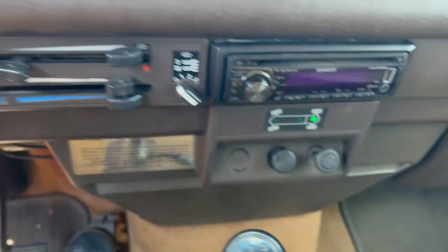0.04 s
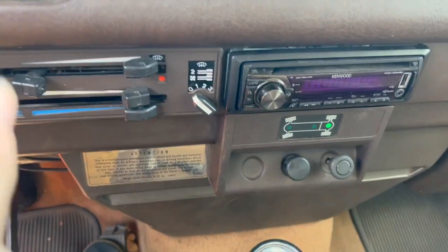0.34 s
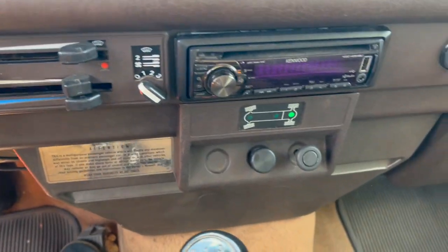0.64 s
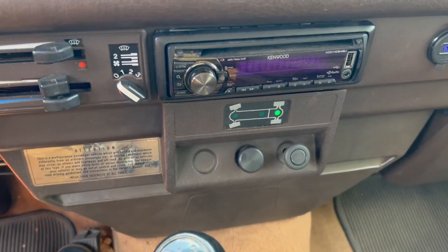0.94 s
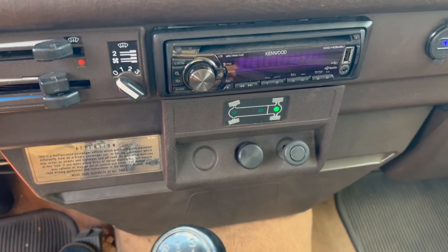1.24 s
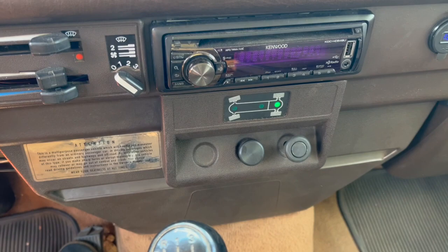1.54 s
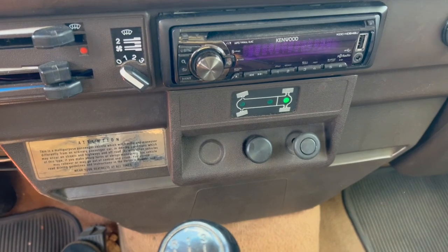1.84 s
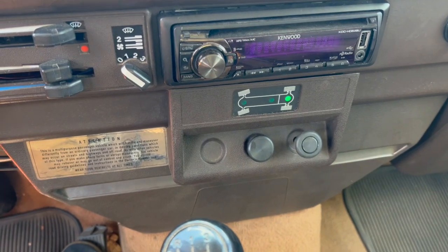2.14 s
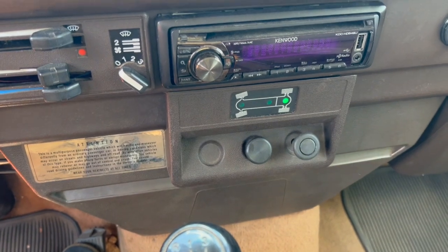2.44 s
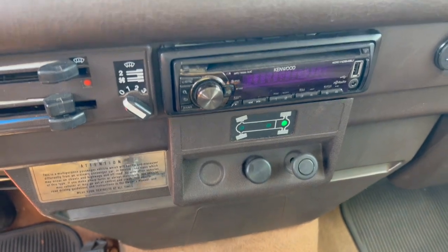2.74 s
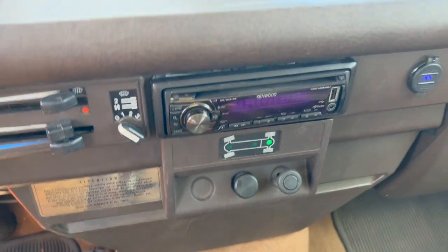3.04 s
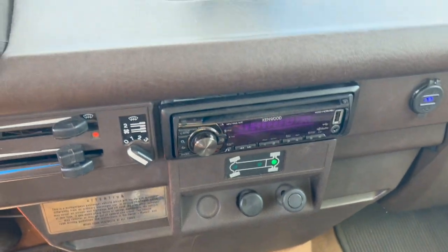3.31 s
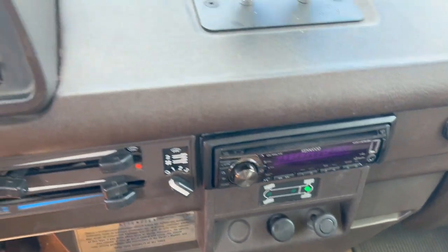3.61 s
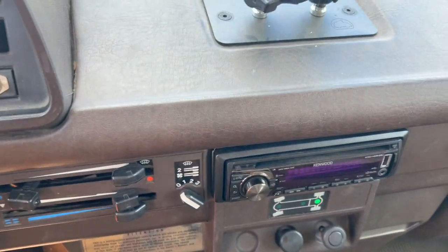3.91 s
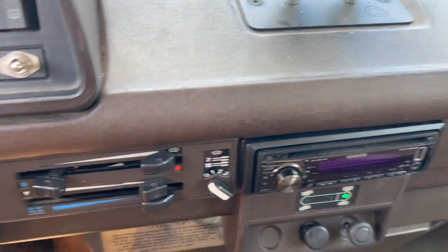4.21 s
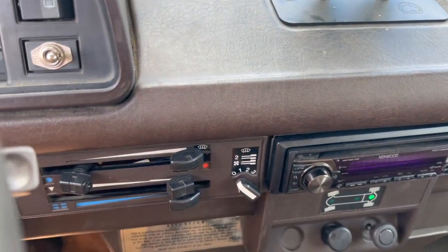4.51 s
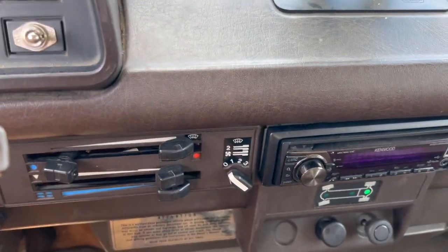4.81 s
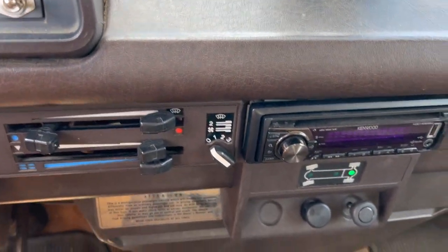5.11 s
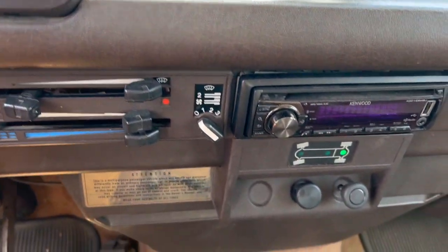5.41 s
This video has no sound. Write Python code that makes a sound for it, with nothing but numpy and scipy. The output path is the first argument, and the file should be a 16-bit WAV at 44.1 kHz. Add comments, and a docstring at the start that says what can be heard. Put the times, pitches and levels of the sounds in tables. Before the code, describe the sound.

A van engine heard from the cab revs gently twice from idle with a deep boom, while the pedal squeaks and clicks.

```python
"""Van engine revved, from the cab.

A flat-four with a sport exhaust is revved gently twice from idle. Uneven exhaust pulses boom in the
pipe and cab over a dull mechanical clatter. The dry accelerator pedal rasps, groans and squeals by
friction, its slack linkage clicks, once loudly, and a shoe snags and rubs on it."""
import sys
import numpy as np
from scipy import signal
from scipy.fft import rfft, irfft
from scipy.io import wavfile
from scipy.ndimage import map_coordinates

SR = 44100
rng = np.random.default_rng(int(sys.argv[2]) if len(sys.argv) > 2 else 0)


def inscribe(sig):
    """Save sig as 16-bit PCM at rate SR to the path in sys.argv[1].

    A 1-D sig is mono; a 2-D sig holds one channel per row.
    Samples are clipped to [-1, 1] before scaling.
    """
    pcm = np.round(np.clip(np.atleast_2d(sig).T, -1, 1) * 32767)
    wavfile.write(sys.argv[1], SR, pcm.astype(np.int16))


N = 249606
T = np.arange(N) / SR
HZ = np.fft.rfftfreq(N, 1 / SR)
TILT_OCTAVES = np.log2(np.maximum(HZ, 220) / 1500)
BAND_EDGE_HZ = 15750

# Crankshaft speed. Each row: time in seconds, speed in rpm.
SPEED_RPM = [(0, 868), (.2, 885), (.35, 897), (.47, 905), (.53, 1075), (.63, 1118.5), (.8, 1310),
             (1.05, 1565), (1.25, 1572.2), (1.66, 1348), (1.9, 1272), (2.17, 1181.7), (2.5, 1199.3),
             (2.91, 1212.2), (3.3, 1282), (3.65, 1339.5), (3.99, 1353.3), (4.58, 1305.2), (5.13, 1216.9),
             (5.66, 1207.4)]
# Exhaust pulse strength. Each row: time in seconds, gain in dB.
LOAD_DB = [(0, -8.5), (.35, -6), (.62, -1.5), (.8, 1), (1.1, 3.5), (1.7, 0.8), (2.2, 0.55), (2.6, 1.1),
           (3.9, 0), (4.6, -0.17), (5.66, 0.85)]
# Strength of the pulses' sharp edges. Each row: time in seconds, gain in dB.
BARK_DB = [(0, -3.5), (.7, 3.5), (1.1, -9), (1.7, 0.9), (2.4, 4), (3.1, 5), (3.9, 3.5), (4.6, 6.5),
           (5.4, 4.5)]
# Speeds in rpm at idle, at fast idle and under throttle.
REGIMES_RPM = [950, 1200, 1350]
# Cylinders in firing order. Each row: pulse size factor in each of the three regimes,
# extra header travel time in ms, edge factor (negative if inverted).
CYLINDERS = [(1.4, .82, .84, .8, .63), (1.09, .1, .23, 0, .93), (1.08, .73, .81, .4, -.42),
             (1.41, .84, .53, 4.9, -.62)]
# Pipe and cab resonances. Each row: frequency in Hz, width in Hz, gain in dB, polarity at the seat,
# share driven by the sharp edge.
BOOM_MODES = [(43.5, 16, -5, 1, .02), (66.75, 7.8, 1.4, -1, .06), (92.4, 8, -9.7, 1, .25),
              (108.8, 5, -23.4, -1, .35), (120, 30.7, -23, 1, .67), (150.5, 8.3, -17.5, -1, .64),
              (178.8, 12.1, -28.5, -1, .31), (205, 9.2, -36, -1, .45)]
# Silencer response. Each row: frequency in Hz, gain in dB.
SILENCER_DB = [(200, 2.5), (300, -12), (500, -21.5), (1000, -64.5)]
# Tailpipe hum. Each row: time in seconds, level in dB.
DRONE_DB = [(0, -56.5), (.7, -38.5), (1, -33), (1.42, -35), (1.7, -44), (5.66, -46.5)]
# Clatter spectrum. Each row: frequency in Hz, relative density in dB.
CLATTER_SPECTRUM_DB = [(120, -17), (190, -3.5), (240, -15), (305, -11.5), (405, -21.5), (560, -23),
                       (815, -24.5), (1050, -30.5), (2000, -39), (3100, -42.5), (5000, -51.5),
                       (7400, -56.5), (11000, -60.5), (15500, -50)]
# Clatter loudness. Each row: time in seconds, level in dB.
CLATTER_DB = [(0, -43), (1.2, -40.5), (1.7, -43), (2.4, -43), (3.1, -40), (4.8, -40), (5.66, -40)]
# Pedal strokes. Each row: start, length and attack in seconds, level in dB, tilt in dB per octave,
# resonance widening factor.
STROKES = [(0.069, 0.24, .003, -51, -2.5, 1.8), (1.16, 0.45, .02, -58.5, -5.5, 0.95),
           (2.831, .52, 0.064, -54, 1.5, 2.1), (4.712, .44, .02, -58, -5, 1.3),
           (5.267, 0.16, 0.0036, -58.5, -1, 3.1)]
# Pedal resonances. Each row: frequency in Hz, half-width in Hz, gain in dB.
PEDAL_MODES = [(1176, 51, 1.5), (1602, 69, -2.5), (2970, 280, -8), (3980, 140, -9), (4600, 150, -8),
               (5200, 180, -9), (6300, 310, -9.5), (8300, 270, -13), (11900, 380, -17.5), (14000, 830, -28)]
# Pedal groans. Each row: start and length in seconds, first and last pitch in Hz, level in dB,
# jitter as a share of pitch.
GROANS = [(0.072, .075, 1620, 1660, -54.5, 0.067), (.145, .05, 1392, 1440, -55, 0.021),
          (0.152, 0.032, 1590, 1640, -51, .04), (0.185, 0.021, 1500, 1700, -46, 0.045),
          (1.18, 0.11, 1500, 1263, -61, 0.034), (1.182, 0.4, 1600, 1617, -59.5, 0.061),
          (1.252, .32, 1324, 1285, -58.5, 0.078), (2.86, 0.2, 1717, 1700, -50.5, 0.063),
          (2.991, 0.061, 1590, 1593, -45.5, 0.048), (3.033, 0.1, 1725, 1795, -54, 0.053),
          (3.125, .04, 1640, 1570, -42, 0.039), (3.165, 0.14, 1670, 1670, -50, 0.065),
          (4.711, .082, 1630, 1680, -49, 0.026), (4.801, .3, 1697, 1657, -58.5, 0.12),
          (5.32, .115, 1424, 1425, -54.5, .016)]
# Linkage clicks. Each row: time in seconds, tick gain in dB, knock gain in dB.
CLICKS = [(0.074, -54.5, -59.5), (0.443, -69, -50), (0.622, -55, -68), (0.686, -43, -72),
          (0.874, -52.5, -89), (2.961, -34, -28)]
# Tick spectrum. Each row: frequency in Hz, relative density in dB.
TICK_SPECTRUM_DB = [(500, -2), (1500, 11.5), (2600, -16.5), (4500, -3), (7000, 0), (10000, -12.5),
                    (13500, 0.5), (16000, -14)]
# Knock resonances. Each row: frequency in Hz, gain in dB, 60 dB decay time in seconds.
KNOCK_MODES = [(245.5, -8, 0.51), (299, -4.5, 0.34), (399.5, -3.5, 0.16), (478, -10, 0.36),
               (560, -8.5, 0.24), (691, 0.5, 0.041), (825, 3, 0.048), (950, -5, 0.055), (1490, -19, 0.033)]
# Hinge squeals. Each row: start and length in seconds, first, middle and last pitch in Hz,
# level in dB, jitter as a share of pitch, tilt in dB per octave.
SQUEALS = [(.135, 0.042, 970, 960, 960, -51.5, .016, -4.5), (0.199, 0.071, 881, 1086, 1165, -52, .018, 2.5),
           (.24, 0.054, 1130, 1175, 1190, -48.5, .0074, -3),
           (.271, 0.047, 1870, 1913, 2040, -58.5, .008, -12),
           (.365, 0.076, 2570, 2530, 2510, -63, .0054, 0),
           (.567, 0.049, 1173, 1203, 1250, -53.5, 0.013, -3),
           (1.014, 0.053, 1146, 1093, 1100, -47.5, 0.02, 2.5),
           (1.056, 0.061, 1110, 1092, 1063, -47.5, 0.018, 2), (1.095, 0.11, 945, 958, 915, -54.5, .026, 2),
           (1.186, 0.4, 947, 935, 917, -62.5, 0.036, 2.5), (3.048, .081, 975, 958, 915, -58.5, 0.0098, 5)]
# Weighting of squeal harmonics. Each row: frequency in Hz, gain in dB.
SQUEAL_SPECTRUM_DB = [(900, 0.5), (1150, 12.5), (1900, -7.5), (2200, -1), (3400, -2.5), (3850, -1),
                      (4550, 3.5), (5000, -10), (5600, -11), (6600, -14), (7800, -15), (9000, -36.5),
                      (12000, -22), (16000, -38)]
# Snags of the sole. Each row: time in seconds, pitch in Hz, level in dB.
SNAGS = [(1.497, 2950, -51.5), (4.718, 1132, -42), (4.798, 1620, -41), (4.847, 1760, -45),
         (4.884, 1140, -43), (4.885, 1660, -39), (4.937, 1425, -41.5), (4.948, 1165, -43.5)]
# Slides of the sole. Each row: peak time, swell and fade in seconds, level in dB,
# tilt in dB per octave, sheen frequency in Hz.
SCUFFS = [(2.929, .15, .54, -57, 8, 6600), (3.577, 0.4, .15, -56, -0.4, 7450),
          (4.259, .85, 0.55, -47, 0.8, 5650), (4.861, 0.56, 0.32, -48.5, -3.5, 4570),
          (5.284, 0.067, 0.3, -42, -3, 6640)]
# Sole friction spectrum. Each row: frequency in Hz, gain in dB.
SOLE_SPECTRUM_DB = [(220, -7.5), (400, -2.5), (650, -2), (830, -2.5), (1050, 2), (1250, -4), (1450, 3),
                    (1900, -6), (2200, -3.5), (2600, -14), (3100, -10.5), (4400, -17.5), (5300, -15.5),
                    (6300, -23), (7600, -14), (10000, -38), (12000, -20), (15500, -36)]
# Stereo balance. Each row: frequency in Hz, left minus right in dB.
BALANCE_DB = [(60, 1), (110, 3.5), (200, 3.5), (400, 1), (700, 2), (1300, 7), (2400, 6), (4400, 6.5),
              (8000, 1.5), (15000, 0.5)]


def amp(db):
    """Decibels to gain."""
    return 10 ** (np.asarray(db) / 20)


def unit_rms(x):
    """Scale to rms one."""
    return x / np.sqrt(np.mean(x ** 2) + 1e-20)


def over_time(rows):
    """Rows of (s, value) at every sample."""
    return np.interp(T, *np.transpose(rows))


def over_hz(rows):
    """Rows of (Hz, value) at every frequency bin."""
    hz, value = np.transpose(rows)
    return np.interp(np.log(HZ + 1), np.log(hz), value)


def filtered(x, gain):
    """Apply a gain per frequency bin."""
    return irfft(rfft(x) * gain, N)


def wander(rate_hz):
    """Smooth noise of rms one, rolling off at the rate."""
    return unit_rms(filtered(rng.standard_normal(N), np.exp(-(HZ / rate_hz) ** 2)))


def gate(start_s, length_s, attack_s, release_s):
    """Trapezoid envelope, zero to one."""
    return np.clip(np.minimum((T - start_s) / attack_s, (start_s + length_s - T) / release_s), 0, 1)


def exhaust(cycles, gain_db=48.5, turbulence_db=-62, unevenness=.055):
    """Four unequal pulses a cycle ring pipe and cab; their sharp edges bark in the upper modes."""
    lead = SR // 2  # already idling and ringing at the start
    cycles = np.r_[cycles[0] + (cycles[1] - cycles[0]) * np.arange(-lead, 0), cycles]
    push, bark = amp(turbulence_db) * rng.standard_normal((2, len(cycles)))
    for k, (*sizes, travel_ms, edge) in enumerate(CYLINDERS):
        fired = np.flatnonzero(np.diff(np.floor(cycles - k / len(CYLINDERS))))
        at = fired + round(travel_ms * SR / 1000)
        at = at[at < len(cycles)]
        burn = 1 + unevenness * rng.standard_normal(len(at))
        rpm = over_time(SPEED_RPM)[np.maximum(at - lead, 0)]
        push[at] += np.interp(rpm, REGIMES_RPM, sizes) * burn
        bark[at] += edge * burn
    bark *= amp(np.pad(over_time(BARK_DB), (lead, 0), "edge"))
    boom = np.zeros(len(cycles))
    for hz, width_hz, db, polarity, edge_share in BOOM_MODES:
        drive = edge_share * bark + (1 - edge_share) * push
        boom += polarity * amp(db) * signal.lfilter(*signal.iirpeak(hz, hz / width_hz, SR), drive)
    # little deep bass sounds below about 36 Hz
    boom = signal.sosfilt(signal.butter(3, 36, "high", fs=SR, output="sos"), boom)
    return filtered(boom[lead:], amp(over_hz(SILENCER_DB))) * amp(over_time(LOAD_DB) + gain_db)


def drone(cycles, lag_turns=.42):
    """The tailpipe hums at three times the firing rate, most near the top of the first rev."""
    return np.cos(2 * np.pi * (3 * len(CYLINDERS) * cycles - lag_turns)) * amp(over_time(DRONE_DB))


def rush(cycles, full_db=-45, centre_hz=205, width_octaves=.22, db_per_rpm=.2, full_rpm=1340, throb=.2):
    """Tailpipe gas flow: a low flutter that grows with speed and surges once a cycle."""
    band = np.exp(-.5 * (np.log2((HZ + 1) / centre_hz) / width_octaves) ** 2)
    surge = 1 + throb * np.cos(2 * np.pi * cycles)
    gas = unit_rms(filtered(rng.standard_normal(N) * surge, band))
    return gas * amp(full_db + db_per_rpm * np.minimum(over_time(SPEED_RPM) - full_rpm, 0))


def clatter(cycles, throb=.071, spread=1.0):
    """Valve gear and fan: dull noise that swells with every firing."""
    noise = rng.standard_normal(N) + spread * rng.standard_normal((2, N))
    firing = 1 + throb * np.cos(2 * np.pi * len(CYLINDERS) * cycles)
    dull = filtered(noise * firing, amp(over_hz(CLATTER_SPECTRUM_DB)))
    return unit_rms(dull) * amp(over_time(CLATTER_DB))


def whine(cycles, centre_hz=9600, offset_hz=65, level_db=-85, throb=.5):
    """A faint, thin pair of tones pulses with the engine's shaking."""
    pair = np.sin(2 * np.pi * centre_hz * T) * np.sin(2 * np.pi * offset_hz * T + wander(14))
    return amp(level_db) * unit_rms(pair) * (1 + throb * np.cos(2 * np.pi * cycles))


def rasp(slips_per_s=4000, flutter_db=2.2, release_s=.11, fade_db_per_s=3):
    """Tiny irregular slips ring the pedal's modes in each stroke; a firm foot damps and widens them."""
    slips = rng.standard_normal(N) * (rng.random(N) < slips_per_s / SR)
    out = np.zeros(N)
    for start_s, length_s, attack_s, db, tilt_db, widening in STROKES:
        power = sum((amp(peak_db) / (1 + ((HZ - hz) / (half_width_hz * widening)) ** 2)) ** 2
                    for hz, half_width_hz, peak_db in PEDAL_MODES)
        ring = unit_rms(filtered(slips, np.sqrt(power) * amp(tilt_db * TILT_OCTAVES)))
        fade_db = fade_db_per_s * np.clip(T - start_s, 0, length_s)
        out += ring * amp(db - fade_db) * gate(start_s, length_s, attack_s, release_s)
    return out * amp(flutter_db * wander(37))


def groans(jitter_rate_hz=330, flutter_db=1.5, ramp_s=.004):
    """Friction drives the pedal's bending mode: a rough gliding tone, purer where the hinge catches."""
    out, waver = np.zeros(N), wander(jitter_rate_hz)
    for start_s, length_s, first_hz, last_hz, db, jitter in GROANS:
        envelope = gate(start_s, length_s, ramp_s, ramp_s)
        on = envelope > 0
        own_waver = np.roll(waver, rng.integers(N))[on]
        hz = np.linspace(first_hz, last_hz, on.sum()) * (1 + jitter * own_waver)
        out[on] += amp(db) * envelope[on] * np.sqrt(2) * np.sin(2 * np.pi * np.cumsum(hz) / SR)
    return out * amp(flutter_db * wander(60))


def clicks(tick_t60_s=.018):
    """Linkage slack snaps over: a bright tick and a short hollow knock."""
    out, t = np.zeros(N), T[:SR // 4]
    fizz = unit_rms(filtered(rng.standard_normal(N), amp(over_hz(TICK_SPECTRUM_DB))))
    knock = sum(amp(db - 60 * t / t60_s) * np.sin(2 * np.pi * hz * t) for hz, db, t60_s in KNOCK_MODES)
    for start_s, tick_db, knock_db in CLICKS:
        span = round(start_s * SR) + np.arange(len(t))
        out[span] += amp(knock_db) * knock + amp(tick_db - 60 * t / tick_t60_s) * fizz[span]
    return out


def squeals(jitter_rate_hz=260, flutter_db=2.5, ramp_s=.012):
    """The hinge sticks and slips at a gliding rate: a wavering stack of harmonics."""
    out, waver = np.zeros(N), wander(jitter_rate_hz)
    for start_s, length_s, first_hz, middle_hz, last_hz, db, jitter, tilt_db in SQUEALS:
        envelope = gate(start_s, length_s, ramp_s, ramp_s)
        on = envelope > 0
        arch = np.polyfit([0, .5, 1], [first_hz, middle_hz, last_hz], 2)
        hz = np.polyval(arch, (T[on] - start_s) / length_s) * (1 + jitter * waver[on])
        phase_rad = 2 * np.pi * np.cumsum(hz) / SR
        tone = np.zeros(len(hz))
        for k in range(1, 14):
            harmonic_db = np.interp(k * hz, *np.transpose(SQUEAL_SPECTRUM_DB)) + tilt_db * np.log2(k)
            tone += amp(harmonic_db) * (k * hz < BAND_EDGE_HZ) * np.sin(k * phase_rad)
        out[on] += unit_rms(tone) * amp(db) * envelope[on]
    return out * amp(flutter_db * wander(90))


def snags(t60_s=.045, jitter=.08):
    """The sole sticks and lets go: a brief, rough chirp of the pedal."""
    out, t, waver = np.zeros(N), T[:SR // 8], wander(600)
    for start_s, hz, db in SNAGS:
        span = round(start_s * SR) + np.arange(len(t))
        phase_rad = 2 * np.pi * np.cumsum(hz * (1 + jitter * waver[span])) / SR
        out[span] += amp(db - 60 * t / t60_s) * np.sqrt(2) * np.sin(phase_rad)
    return out


def scuffs(grain_db=1.0, flutter_db=.9, spread=2.9, shift=.012, sheen_db=4, sheen_half_width_hz=560):
    """The sole slides on the pedal: grainy swells of hiss whose resonances shift as the contact moves."""
    noise = rng.standard_normal(N) + spread * rng.standard_normal((2, N))
    grains = noise * amp(grain_db * wander(550) + flutter_db * wander(25))
    warped_index = np.cumsum(1 + shift * wander(5))
    hiss = filtered(grains, amp(over_hz(SOLE_SPECTRUM_DB)))
    hiss = np.array([map_coordinates(side, [warped_index], order=3, mode="wrap") for side in hiss])
    out = np.zeros((2, N))
    for peak_s, swell_s, fade_s, db, tilt_db, sheen_hz in SCUFFS:
        colour_db = tilt_db * TILT_OCTAVES + sheen_db / (1 + ((HZ - sheen_hz) / sheen_half_width_hz) ** 2)
        drop_db = 14 * np.maximum((peak_s - T) / swell_s, (T - peak_s) / fade_s) ** 1.36
        out += unit_rms(filtered(hiss, amp(colour_db))) * amp(db - drop_db)
    return out


def cab(x, wet_db, t60_s):
    """Direct sound plus dense, short reflections, different on each side."""
    t = T[:SR // 6]
    tails = rng.standard_normal((2, len(t))) * amp(-60 * t / t60_s) * (t > .001)
    tails /= np.linalg.norm(tails, axis=1, keepdims=True)
    wet = amp(wet_db)
    return (x + wet * signal.oaconvolve(x[None], tails, axes=1)[:, :N]) / np.hypot(1, wet)


def scene(first_firing_cycles=.374):
    """Engine, at two revolutions a cycle, plus footwell sounds; louder on the left."""
    cycles = np.cumsum(over_time(SPEED_RPM)) / (2 * 60 * SR) - first_firing_cycles
    footwell = cab(squeals(), wet_db=-6, t60_s=.03)
    footwell += cab(groans(), wet_db=-4, t60_s=.03)
    footwell += cab(rasp(), wet_db=0, t60_s=.025)
    footwell += scuffs()
    footwell += cab(clicks() + snags(), wet_db=-3, t60_s=.06)
    engine = exhaust(cycles) + drone(cycles) + rush(cycles) + clatter(cycles) + whine(cycles)
    return filtered(engine + footwell, amp(np.outer([.5, -.5], over_hz(BALANCE_DB))))


def record(dry):
    """Steep low-pass at the band edge."""
    lowpass = signal.firwin(511, BAND_EDGE_HZ, window=("kaiser", 9), fs=SR)
    return signal.oaconvolve(dry, lowpass[None], "same")


dry = scene()
out = record(dry)
inscribe(out)
```